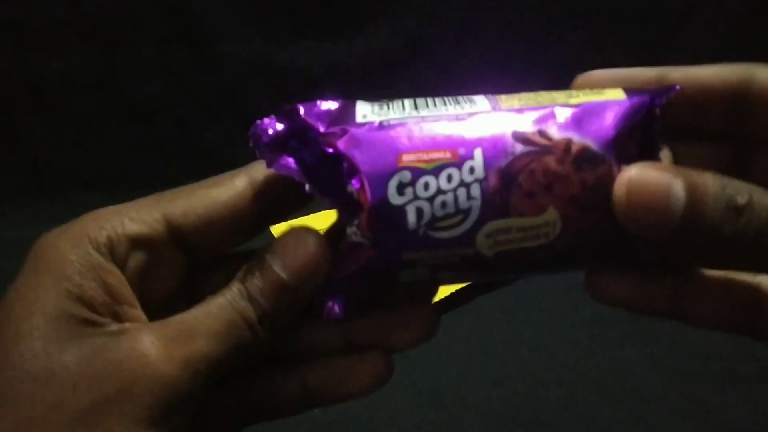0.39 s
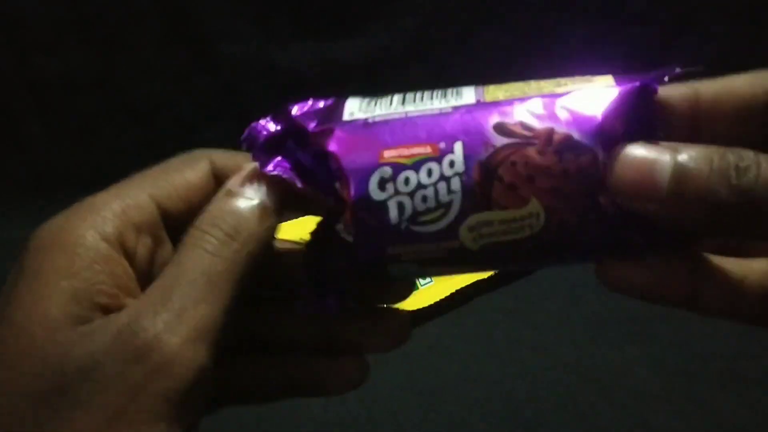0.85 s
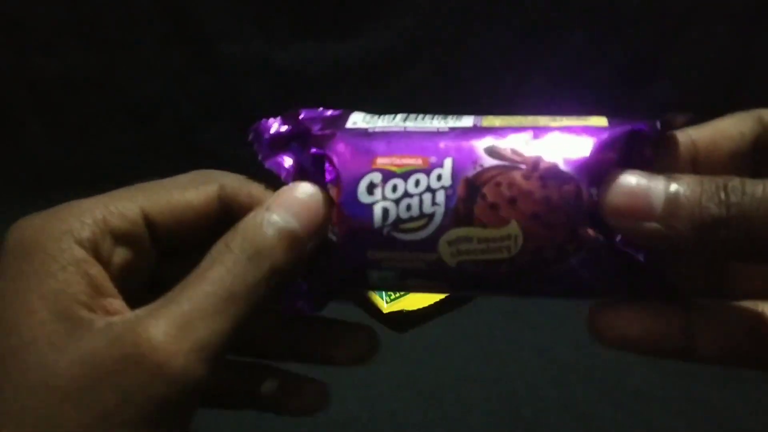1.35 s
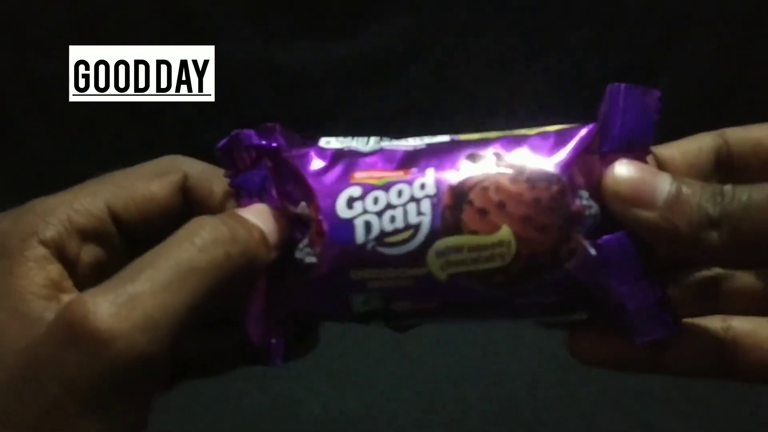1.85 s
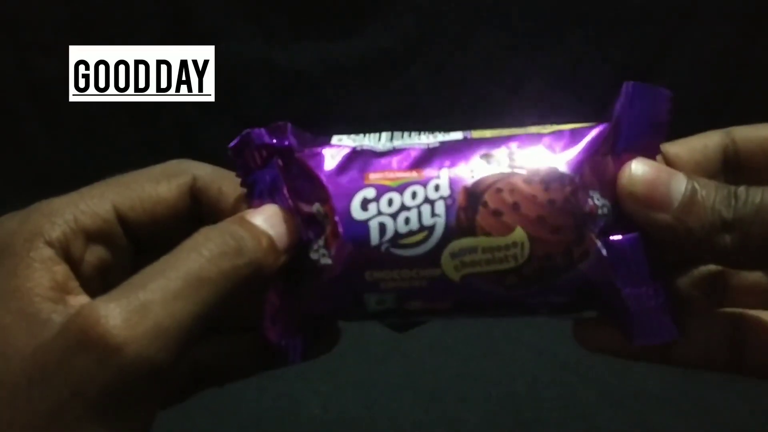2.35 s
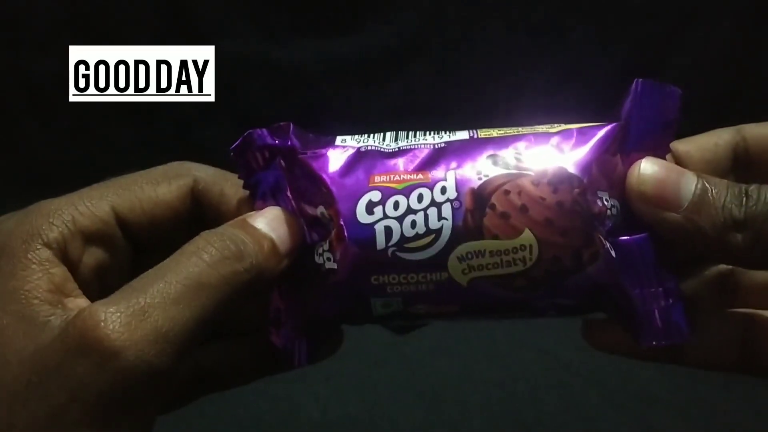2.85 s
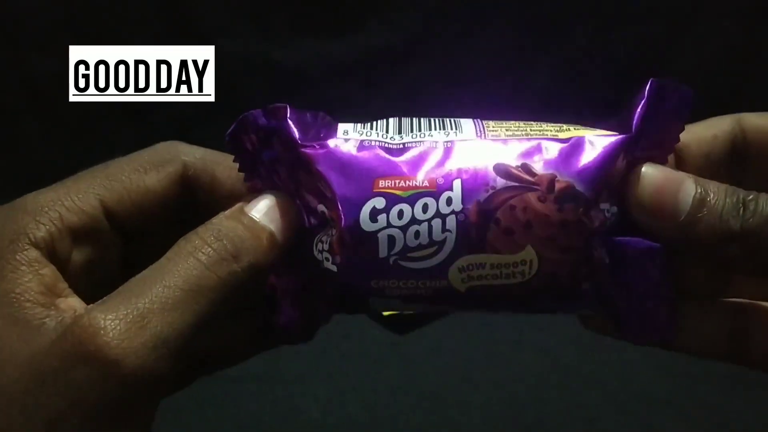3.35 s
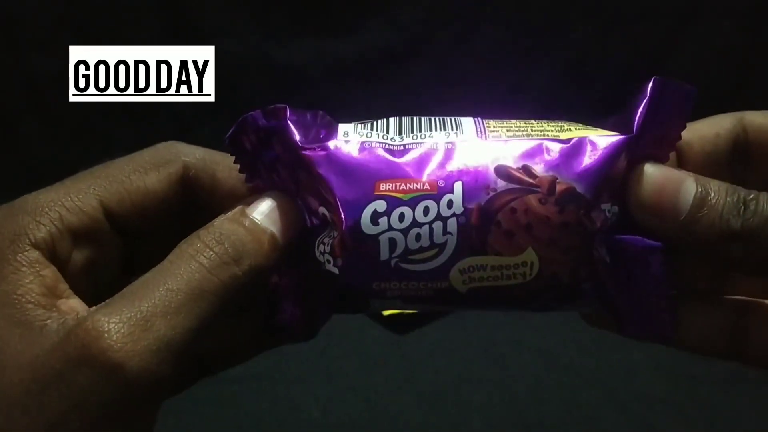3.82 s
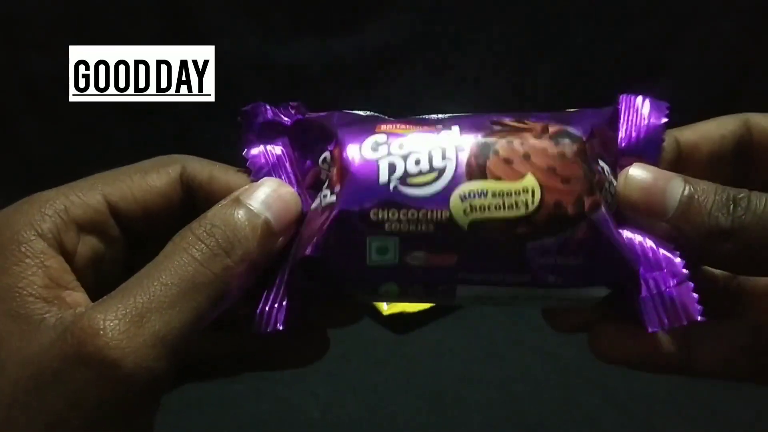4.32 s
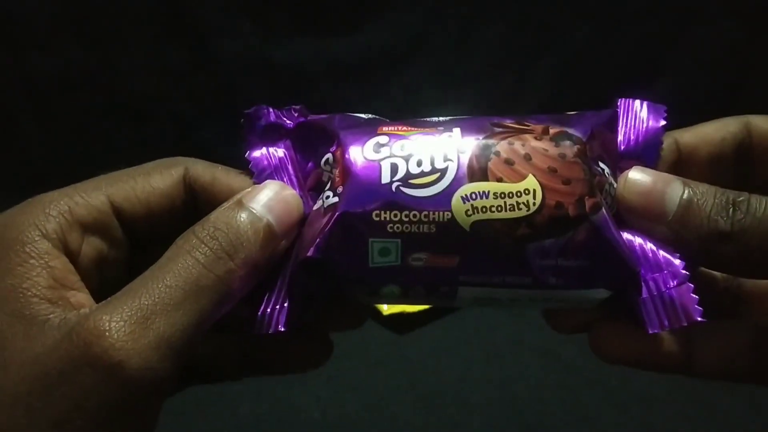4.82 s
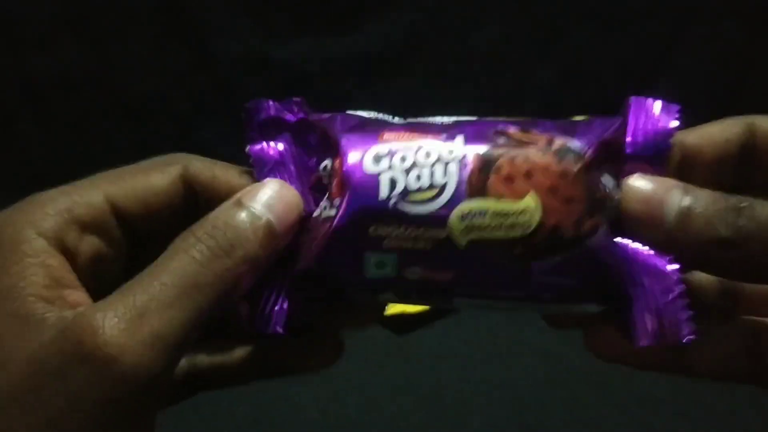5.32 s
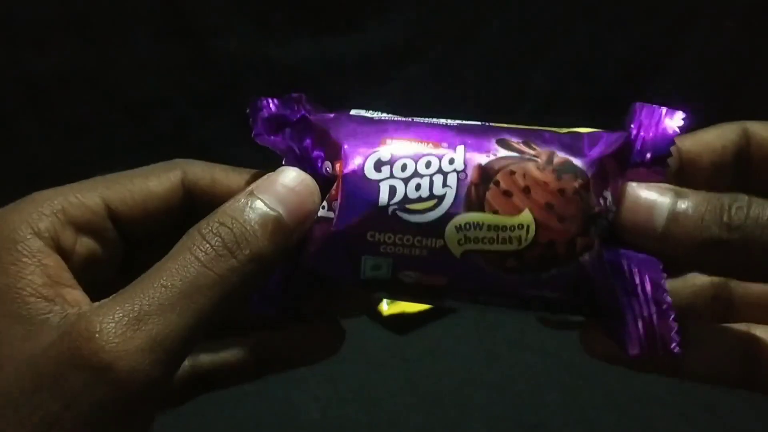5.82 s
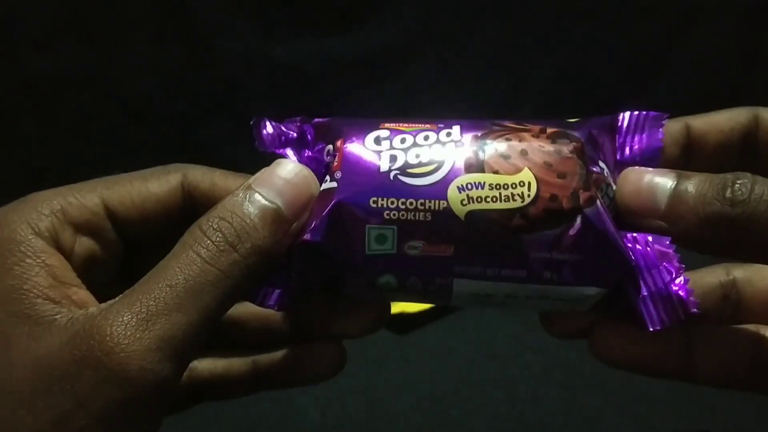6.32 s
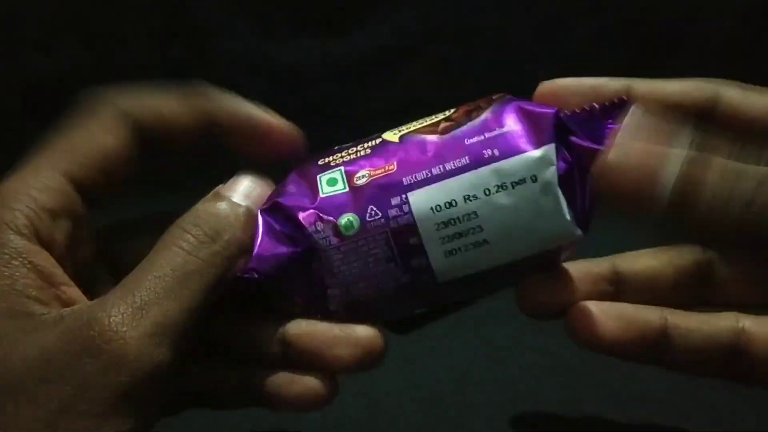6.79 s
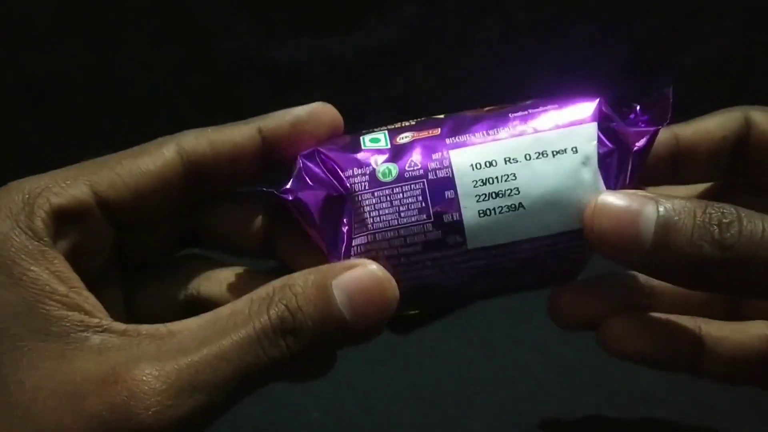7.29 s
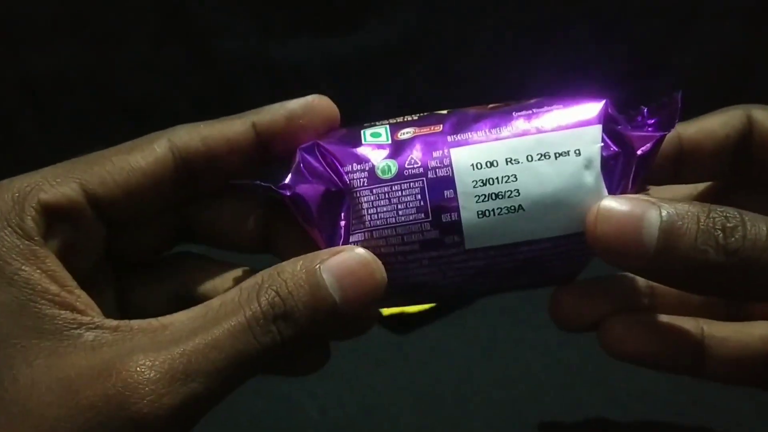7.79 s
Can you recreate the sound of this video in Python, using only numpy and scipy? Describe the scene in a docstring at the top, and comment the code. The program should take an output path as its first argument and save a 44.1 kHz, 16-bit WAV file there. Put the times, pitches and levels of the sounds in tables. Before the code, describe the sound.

A stiff foil-lined snack wrapper crackles busily close by, then settles into sparse ticks and brief crinkly bursts in a small bare room.

```python
"""A stiff foil-lined wrapper is held and turned close to a pair of microphones in a small bare room.
Each large crease that buckles snaps for a few milliseconds: bursts of slips in three bands, a facet ringing.
Smaller crinkles fall by chance, as loud as the fingers move, and skin rubs the film as grainy filtered noise.
The room answers with decaying noise tails; behind lie low rumble and hiss made of shaped noise,
steady whines and a passing drone made of wavering sines."""
import sys
import numpy as np
from scipy import signal
from scipy.fft import rfft, irfft, next_fast_len
from scipy.io import wavfile
from scipy.ndimage import uniform_filter1d, map_coordinates

SR = 44100
rng = np.random.default_rng(int(sys.argv[2]) if len(sys.argv) > 2 else 0)


def waveform_to_disk(signal):
    """Save audio, clipped to [-1, 1], as 16-bit WAV at the path in sys.argv[1]."""
    frames = np.transpose(np.atleast_2d(signal))
    scaled = np.clip(frames, -1, 1) * 32767
    samples = np.round(scaled).astype(np.int16)
    wavfile.write(sys.argv[1], SR, samples)


def boost(x):
    """Linear amplitude factor 10**(x/20) for a level x in decibels (scalar or array-like)."""
    u = np.asarray(x, float) / 20
    return 10 ** u


N = 348831  # length in samples


def unit(x):
    """Scale a sound to rms 1."""
    return x / np.sqrt(np.mean(x ** 2) + 1e-20)


def along(points, hz):
    """Read a curve of (frequency, value) points on a log frequency axis."""
    point_hz, value = np.transpose(points)
    return np.interp(np.log(hz + 1), np.log(point_hz + 1), value)


def wobble(rate_hz):
    """A smooth random curve through rate_hz random knots a second."""
    knots = rng.standard_normal(int(N * rate_hz / SR) + 4)
    return map_coordinates(knots, [np.arange(N) * rate_hz / SR])


def filtered(x, response):
    """Shape the spectrum of x by a response of frequency."""
    size = next_fast_len(x.shape[-1] + 8192)
    spectrum = rfft(x, size) * response(np.fft.rfftfreq(size, 1 / SR))
    return irfft(spectrum, size)[..., :x.shape[-1]]


def patchy(x, depth_db):
    """Random patches of gain in time and frequency, deepest in the bass."""
    hz, _, cells = signal.stft(x, SR, nperseg=2048)
    field = uniform_filter1d(rng.standard_normal(cells.shape[1:]), 2, 0)
    field = unit(uniform_filter1d(field, 8, 1))
    gain_db = depth_db * field / (1 + (hz[:, None] / 700) ** 2)
    return signal.istft(cells * boost(gain_db), nperseg=2048)[1][:, :N]


# Spectrum shape of rumble and hiss, only relative: pitch_hz [Hz], density_db [dB per Hz]
AIR_SPECTRUM = [(25, -42), (60, -50), (100, -15), (150, -13.5), (185, -1.5), (330, -2.5), (500, -5),
                (750, -11), (1300, -12.5), (2400, -14.5), (4500, -17.5), (8000, -17), (12000, -18),
                (15000, -14), (16000, -26)]
# How alike diffuse sound is at the two microphones, also used by the room: pitch_hz [Hz], likeness [0-1]
DIFFUSE_LIKENESS = [(60, 0), (240, 0.76), (950, 0), (3770, 0), (15000, 0.02)]


def rumble_and_hiss():
    """Shaped noise, most alike at both microphones near 240 Hz; its level drifts slowly."""
    noise = patchy(rng.standard_normal((2, N)), depth_db=2.5)

    def mid_side(hz):
        # the cosine of twice this angle is the left-right likeness
        angle = np.arccos(np.clip(along(DIFFUSE_LIKENESS, hz), -1, 1)) / 2
        return boost(along(AIR_SPECTRUM, hz)) * [np.cos(angle), np.sin(angle)]

    mid, side = filtered(noise, mid_side)
    level_db = -57.5 + 0.6 * wobble(1.2)
    return boost(level_db) * unit(np.array([mid + side, mid - side]))


def wavering_tone(pitch_hz, level_db, waver_rad):
    """A sine whose level and phase waver a little at random."""
    t = np.arange(N) / SR
    level = boost(level_db + 0.49 * wobble(4.1)) * np.sqrt(2)  # level_db is rms
    return level * np.sin(2 * np.pi * pitch_hz * t + waver_rad * wobble(2.6))


# Steady tones, before their waver: pitch_hz [Hz], level_db [dB rms]
WHINE_TONES = [(1061, -74.5), (1244, -77), (3365, -77), (3548, -77.5)]


def whines():
    """Thin tones that hold their pitch, each wavering slightly."""
    return sum(wavering_tone(hz, db, waver_rad=0.14) for hz, db in WHINE_TONES)


# Swell of a far engine as it passes: time_s [s], level_db [dB]
DRONE_SWELL = [(4.2, -92), (4.5, -67.5), (5.2, -60.5), (5.6, -66), (6.0, -63.5), (6.3, -83)]
# Tones of that engine, relative to the swell: pitch_hz [Hz], level_db [dB rms]
ENGINE_TONES = [(181, -8.5), (301.5, -1.5)]


def drone():
    """A far engine passes: low tones of fixed pitch swell and fade together."""
    swell_db = np.interp(np.arange(N) / SR, *np.transpose(DRONE_SWELL))
    return boost(swell_db) * sum(wavering_tone(hz, db, waver_rad=0.085) for hz, db in ENGINE_TONES)


# Decay of the small bare room: pitch_hz [Hz], t60_s [s]
ROOM_DECAY = [(300, 0.23), (2000, 0.38), (5500, 0.28), (14000, 0.29)]
# Colour of the room's answer: pitch_hz [Hz], gain_db [dB]
ROOM_TONE = [(150, 5.5), (400, -2), (1500, 1), (4000, 0), (8000, 3), (16000, -5.5)]


def room(x, spans=26):
    """Noise tails, each frequency dying at its own speed; a new tail every 0.3 s as the hands move."""
    out = np.zeros((2, N + SR))
    age = np.arange(SR // 2) / SR
    for at in np.array_split(np.arange(N), spans):
        hz, t, cells = signal.stft(rng.standard_normal((2, SR // 2)), SR, nperseg=256)
        alike = along(DIFFUSE_LIKENESS, hz)[:, None]
        cells[1] = alike * cells[0] + np.sqrt(1 - alike ** 2) * cells[1]
        # broad frequency regions are a little louder or softer in each tail
        broad = unit(uniform_filter1d(rng.standard_normal((len(hz), 1)), 14, 0))
        cells = cells * boost(1.5 * broad)
        decay = boost(-60 * t / along(ROOM_DECAY, hz)[:, None])
        tail = signal.istft(cells * decay, SR, nperseg=256)[1][:, :SR // 2]
        # early echoes are few and uneven
        sparse = boost(6.0 * np.exp(-age / 0.022) * rng.standard_normal(tail.shape))
        gap = 1 - np.exp(-(age / 0.0091) ** 2)  # the walls answer after a gap
        tail = tail * sparse * gap
        tail = boost(-7) * tail / np.linalg.norm(tail[0])
        wet = signal.fftconvolve(x[:, at], tail, axes=1)
        out[:, at[0]:at[0] + wet.shape[1]] += wet
    return filtered(out[:, :N], lambda hz: boost(along(ROOM_TONE, hz)))


# Fingers sliding on the film, levels before the stroke's fade:
# middle_s [s], length_s [s], centre_hz [Hz], level_db [dB rms]
RUB_STROKES = [(0.357, 0.12, 2680, -36.5), (1.63, 0.084, 4780, -42), (1.653, 0.051, 11700, -28),
               (3.325, 0.084, 2300, -58), (6.647, 0.11, 680, -52), (6.735, 0.094, 560, -40.5),
               (7.17, 0.059, 1200, -59)]


def rubs():
    """Skin on film: grainy noise in a wide band under a smooth stroke."""
    t = np.arange(N) / SR
    sound = 0
    for middle_s, length_s, centre_hz, level_db in RUB_STROKES:
        grain = rng.standard_normal((3, N)) * boost(2.5 * wobble(400))  # left, right, room send
        band = lambda hz: np.exp(-np.log((hz + 1) / centre_hz) ** 2 / 0.5)
        stroke = np.exp(-((t - middle_s) / length_s * 2) ** 4)
        sound = sound + boost(level_db) * unit(filtered(grain, band)) * stroke
    return sound


# The three parts of a snap, panel, crease and fizz: low_hz [Hz], high_hz [Hz, upper limit], t60_s [s],
# likeness [0-1, left-right, of the slips], slip_db [dB, main slip], lead_in_db [dB, lead-in noise]
SNAP_PARTS = [(304, 1550, 0.022, 0.91, 20, -16.5), (1755, 7560, 0.019, 0.47, 22.5, -9.5),
              (6500, 20000, 0.013, 0.81, 20.5, -9)]


def buckle(rows, spiky_db, rise_s, ring_width, ring_db, lag_s, size=1024, lead=256):
    """Creases flip: spiky slips in three bands ring a facet, for left, right and the room send."""
    start_s, *levels, ring_hz, pan_db = np.asarray(rows, float).T[:, :, None]
    count = len(start_s)
    t = (np.arange(size) - lead) / SR
    f = np.fft.rfftfreq(size, 1 / SR) + 1
    # a few slips are far larger than the rest
    slips = boost(spiky_db * rng.standard_normal((count, size)))
    # soft noise swells for a moment before the snap, by a chance amount
    lead_in = np.exp(np.minimum(t, 0) / 0.0015) * (t < 0)
    lead_in = lead_in * boost(4.3 * rng.standard_normal((count, 1)))
    ring = 1j * ring_width / (ring_hz / f - f / ring_hz + 1j * ring_width)
    # one microphone is nearer
    apart = np.exp(1j * np.pi * f * lag_s * rng.standard_normal((count, 1)))
    late = np.exp(-2j * np.pi * f * lead / SR)
    sound = 0
    for level_db, (low_hz, high_hz, t60_s, alike, slip_db, lead_in_db) in zip(levels, SNAP_PARTS):
        shared, *own = rng.standard_normal((3, count, size))
        alike = np.clip(alike, 0, 1)
        burst = np.sqrt(alike) * shared + np.sqrt(1 - alike) * np.array(own)
        release = (1 - np.exp(-np.maximum(t, 0) / rise_s)) * boost(-60 * t / t60_s)
        burst = burst * slips * (boost(lead_in_db) * lead_in + release)
        burst[..., lead + 8] += boost(slip_db)  # the main slip, the moment the crease flips
        if low_hz < SR / 10:  # a large facet is dull; fizz stays bright
            high_hz = np.clip(1.37 * ring_hz, np.minimum(2.0 * low_hz, high_hz), high_hz)
        # a trace of thump stays below the band
        above = (1j * f / low_hz / (1 + 1j * f / low_hz)) ** 4 + boost(-46.0)
        band = above / (1 + 1j * f / high_hz * np.sqrt(2) - (f / high_hz) ** 2) ** 2
        direct = rfft(burst) * (1 + boost(ring_db) * ring) * np.array([apart, 1 / apart])
        # summed over all directions the spectrum is smooth
        diffuse = late * (1 + boost(ring_db - 18.0) * ring)
        part = irfft(np.array([*direct, diffuse]) * band, size)
        energy = np.sum(part ** 2, axis=2, keepdims=True) * 1000 / SR  # 1 = 1 ms at full scale
        sound = sound + part * boost(level_db) / np.sqrt(energy)
    sound = sound * boost(np.array([pan_db, -pan_db, 0 * pan_db]) / 2)
    at = np.round(start_s * SR).astype(int) + np.arange(size) - lead
    at = np.maximum(at, 0).ravel()
    return np.array([np.bincount(at, side.ravel(), N + size)[:N] for side in sound])


# Finger movement, before each crinkle's own scatter: time_s [s], level_db [dB]
FINGER_MOVEMENT = [(0, -59), (.4, -45.5), (.75, -63), (1.0, -37.5), (1.17, -78), (1.45, -40), (1.87, -40.5),
                   (2.05, -63), (2.35, -54), (2.55, -86), (3.15, -77), (3.3, -75), (3.5, -83), (4.15, -63),
                   (4.33, -48), (4.5, -74), (5.3, -70), (5.47, -48), (5.65, -62), (6.55, -63.5),
                   (6.75, -44), (7.05, -53.5), (7.3, -56.5), (7.45, -68)]
# Mean colour of a small crinkle: panel_db, crease_db, fizz_db [dB, added to the movement]
CRINKLE_COLOUR = [-0.5, 4.5, 0]


def crinkles(count=2000):
    """Small creases give way at random moments, as loud as the fingers move."""
    luck = rng.random((count, 2))
    scatter = rng.standard_normal((count, 5))
    start_s = luck[:, 0] * N / SR
    size_db = np.interp(start_s, *np.transpose(FINGER_MOVEMENT))
    size_db = size_db - 3.4 * np.log(luck[:, 1] + 0.51)  # many small, few large
    levels_db = size_db[:, None] + CRINKLE_COLOUR + 4.05 * scatter[:, :3]
    ring_hz = 3500 * np.exp(0.859 * scatter[:, 3])
    pan_db = 1.5 * scatter[:, 4]
    rows = np.column_stack([start_s, levels_db, ring_hz, pan_db])
    return buckle(rows, spiky_db=6, rise_s=0.00054, ring_width=0.12, ring_db=15.5, lag_s=0.00008, size=768)


# The clearest creases; levels are energy before panning and tone colour, 0 dB = 1 ms at full scale:
# start_s [s], panel_db [dB], crease_db [dB], fizz_db [dB], ring_hz [Hz]
LARGE_CREASES = [(.018, -39, -35.5, -38, 794), (0.0372, -39.5, -24, -20.5, 14850),
                 (.0843, -34, -62, -55, 704), (.1122, -63, -26, -43, 3790), (0.1225, -37, -19, -22, 5300),
                 (0.1334, -60, -20.5, -17, 4170), (0.1608, -35, -19.5, -16, 10900),
                 (0.1835, -52, -41, -25.5, 3740), (.201, -50, -23, -21, 4500),
                 (0.2306, -27.5, -24, -29.5, 3100), (.306, -55, -23, -31, 9000),
                 (0.3081, -24, -12, -10.5, 3340), (.423, -35, -18, -17, 9400), (.4555, -54, -41, -30, 9000),
                 (.5228, -58, -50, -36, 10000), (0.5471, -23.5, -15, -15.5, 4540),
                 (0.5792, -32, -17.5, -22, 4700), (.5912, -23, -13, -19.5, 2580),
                 (.667, -45, -50, -28, 10300), (0.6818, -35, -21.5, -24, 4860),
                 (0.6996, -26.5, -25.5, -30, 1130), (.749, -60, -22, -37, 3560),
                 (.766, -53, -47, -31, 8100), (.7742, -68, -27, -34, 8900), (.782, -66, -31, -25, 12000),
                 (.7887, -67, -54, -25, 8500), (.7999, -32.5, -35, -37, 5000),
                 (0.803, -31.5, -16, -26.5, 6450), (.8109, -66, -52, -23, 12000),
                 (.8194, -43, -26, -24, 8700), (.8349, -37, -26, -26, 10000), (.859, -40, -19, -18, 11000),
                 (.862, -22, -29, -10.5, 10700), (.8675, -44, -21, -28, 4400),
                 (.8887, -54, -21, -29, 13000), (0.893, -31, -22.5, -19, 11200),
                 (.8962, -23, -27, -24, 1090), (0.9364, -34, -22, -23, 4660),
                 (0.943, -29, -23, -18.5, 4570), (.9508, -27, -60, -60, 700),
                 (0.9666, -52, -19.5, -21, 5510), (0.9787, -27.5, -29, -39, 770),
                 (.999, -30, -17.5, -15.5, 2140), (1.1304, -47, -32, -27, 9400),
                 (1.1656, -59, -40, -41, 10800), (1.1965, -29.5, -17, -13.5, 9000),
                 (1.1992, -27, -12, -15, 3500), (1.2176, -30, -45, -16, 12400),
                 (1.2308, -20, -47, -19, 880), (1.2725, -28.5, -15, -10, 14800),
                 (1.304, -20.5, -16.5, -22, 810), (1.3963, -43, -30, -41, 10000),
                 (1.4153, -27, -24.5, -32, 2300), (1.4278, -30, -19, -19.5, 4670),
                 (1.4814, -28.5, -25.5, -25, 4000), (1.4935, -14, -15.5, -21, 1130),
                 (1.5006, -44, -19.5, -23, 3420), (1.5153, -25, -34, -34, 830),
                 (1.5428, -51, -20, -16.5, 6850), (1.5535, -50, -16, -18, 7040),
                 (1.6113, -32, -31, -44, 800), (1.635, -21.5, -21, -38, 1220),
                 (1.7256, -55, -22, -38, 7040), (1.7309, -16.5, -12, -15, 3350),
                 (1.7613, -48, -33, -15, 10500), (1.7793, -42, -18.5, -26, 3570),
                 (1.7997, -19.5, -13, -20, 7400), (1.8077, -34, -19, -35, 3530),
                 (1.817, -25, -15, -15, 3100), (1.829, -25, -11, -19, 7450), (1.8349, -31, -10, -35, 2330),
                 (1.8382, -28, -35, -8.5, 6500), (1.908, -31.5, -17.5, -18, 4500),
                 (1.9211, -26.5, -24, -25, 2070), (1.9338, -26.5, -15.5, -24, 2300),
                 (1.9519, -35, -21.5, -19, 5630), (2.0089, -45, -32, -27, 13000),
                 (2.0329, -41, -33.5, -34, 4000), (2.0434, -56, -39, -32, 14000),
                 (2.1152, -48, -60, -66, 900), (2.1468, -33, -27, -61, 1720),
                 (2.1921, -33.5, -36, -39, 1140), (2.2324, -44, -26, -19.5, 4900),
                 (2.2439, -37, -31.5, -48, 1500), (2.2758, -34, -24, -30, 5850),
                 (2.3329, -60, -40, -41, 12000), (2.3375, -32, -31.5, -45, 3960),
                 (2.3504, -50, -32.5, -60, 1830), (2.4098, -51, -60, -66, 1380),
                 (2.4168, -42, -45, -41, 12000), (2.435, -46, -37.5, -58, 1500),
                 (3.2057, -50, -37.5, -46, 1940), (3.2177, -66, -58, -41, 11000),
                 (3.2381, -48, -34, -25, 15100), (3.2717, -31.5, -23.5, -27, 2280),
                 (3.283, -41, -32, -26.5, 14300), (3.332, -54, -35, -30, 12000),
                 (3.3501, -66, -56, -36, 12000), (3.3848, -51, -53, -35, 12200),
                 (3.421, -25.5, -17, -15, 3620), (3.637, -60, -47.5, -63, 3020),
                 (3.9263, -77, -70, -37.5, 10300), (3.9465, -65, -63, -38.5, 11300),
                 (4.196, -66, -55, -52, 7000), (4.2251, -60, -42.5, -43, 3200),
                 (4.271, -24.5, -15.5, -18, 2780), (4.311, -61, -36, -35, 10000),
                 (4.3264, -48, -42, -47, 3000), (4.3549, -20, -26, -28, 1300),
                 (4.3601, -53, -43, -38, 1200), (4.435, -39.5, -31.5, -31.5, 3860),
                 (4.5773, -50, -42.5, -49, 4400), (4.7085, -33.5, -87, -76, 584),
                 (4.818, -64, -27, -50, 2840), (4.8456, -39, -31.5, -31, 5200),
                 (4.9335, -61, -38, -42, 8300), (4.9418, -51, -38, -32, 9100),
                 (5.353, -39, -39, -29.5, 10700), (5.384, -26.5, -15.5, -16.5, 3850),
                 (5.4385, -23.5, -12.5, -16.5, 3650), (5.4474, -23, -45, -50, 1030),
                 (5.4613, -36, -22, -23.5, 4740), (5.4953, -24.5, -42, -60, 1200),
                 (5.5054, -29, -8.5, -18.5, 3440), (5.516, -24.5, -37, -22, 3940),
                 (5.5302, -27.5, -40, -41, 3900), (5.5537, -33, -30, -43, 660),
                 (5.5798, -60, -45, -32, 9600), (5.9013, -46, -47, -35.5, 2010),
                 (5.9373, -66, -43, -43, 5000), (6.156, -35, -56, -50, 593), (6.1727, -58, -46, -40, 2300),
                 (6.614, -43, -34.5, -32, 14600), (6.6423, -31, -28, -32, 7300),
                 (6.6973, -28.5, -28, -21.5, 790), (6.7275, -23.5, -17, -33, 9600),
                 (6.7315, -19.5, -11.5, -20, 3940), (6.7435, -47, -21, -40, 3300),
                 (6.76, -54, -23, -17.5, 3640), (6.7713, -49, -24, -28, 3520),
                 (6.7778, -38, -30, -19, 13000), (6.7801, -22, -11.5, -20, 4330),
                 (6.8015, -36, -43, -46, 900), (6.8326, -27, -44, -50, 920), (6.9025, -46, -22, -39, 3200),
                 (6.911, -57, -24.5, -30, 3700), (6.9293, -30, -54, -63, 930),
                 (6.941, -31.5, -32, -38, 1380), (6.9442, -41, -26.5, -41, 4930),
                 (7.025, -24.5, -23.5, -37, 1530), (7.0325, -30, -31, -43, 1780),
                 (7.1275, -64, -42, -55, 5500), (7.1415, -44, -46, -66, 1460),
                 (7.1607, -43, -39, -42, 6000), (7.2351, -59, -39, -37, 4030),
                 (7.2516, -35, -30, -60, 1410), (7.2637, -31, -52, -62, 1407),
                 (7.2994, -56, -36.5, -43, 9000), (7.314, -60, -34.5, -46, 6500),
                 (7.3497, -33.5, -24.5, -29.5, 1302), (7.8213, -30, -17.5, -18.5, 9800)]


def snaps():
    """The large creases buckle, each at a chance place along the wrapper."""
    pan_db = 1.5 * rng.standard_normal(len(LARGE_CREASES))
    rows = np.column_stack([LARGE_CREASES, pan_db])
    return buckle(rows, spiky_db=5.5, rise_s=0.000047, ring_width=0.53, ring_db=14.5, lag_s=0.000065)


# Broad tone colour of the wrapper sound, with a steep cut above 16 kHz: pitch_hz [Hz], gain_db [dB]
TONE_COLOUR = [(20, 11.5), (150, 5), (400, 2), (3000, -2), (11000, 0.5), (15800, -2.5), (16300, -31)]


def tone_colour(x):
    """Broad tone colour of the wrapper sound, with a steep cut above 16 kHz."""
    return filtered(x, lambda hz: boost(along(TONE_COLOUR, hz)))


def scene():
    """The wrapper and its room through the tone colour, over the background."""
    background = rumble_and_hiss() + drone() + whines()
    wrapper = snaps() + crinkles() + rubs()
    direct, room_send = wrapper[:2], wrapper[2:]
    return tone_colour(direct + room(room_send)) + background


def band_limit(x):
    """A steep low-pass at the top of the band."""
    return signal.sosfilt(signal.butter(12, 16990, fs=SR, output="sos"), x)


def record(dry):
    """Peaks are clipped at full scale to finish the mix."""
    mix = np.clip(dry, -1, 1)
    return band_limit(mix)


dry = scene()
out = record(dry)
waveform_to_disk(out)
```